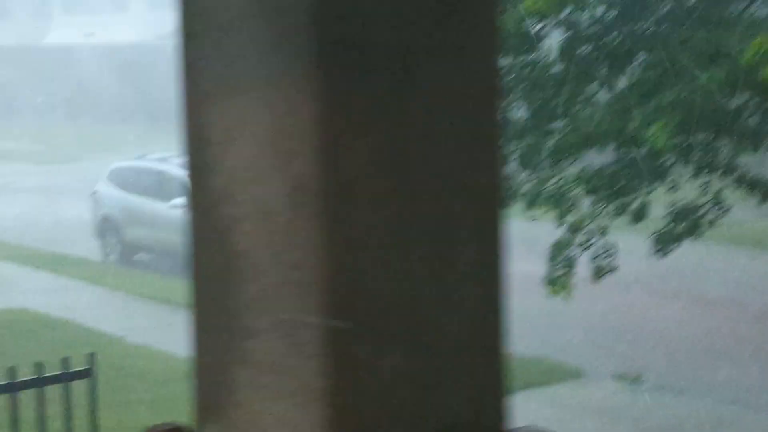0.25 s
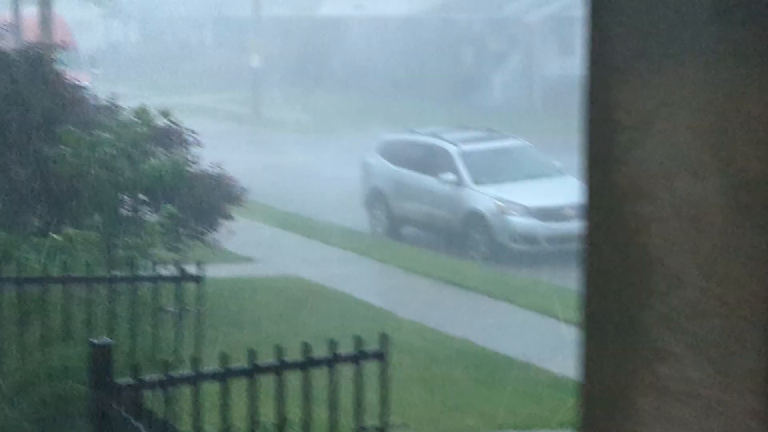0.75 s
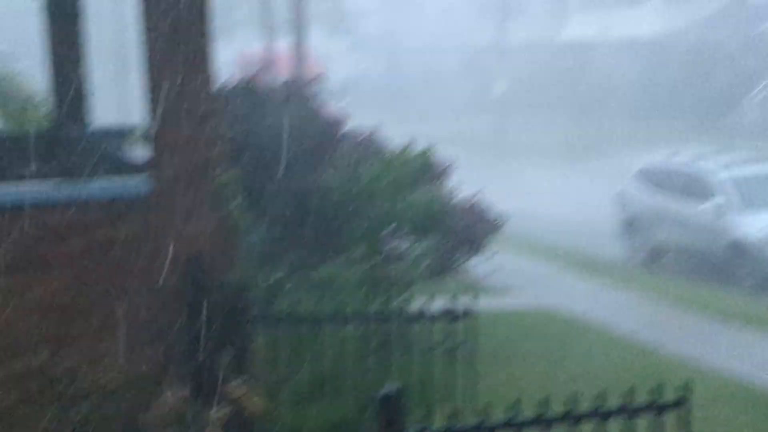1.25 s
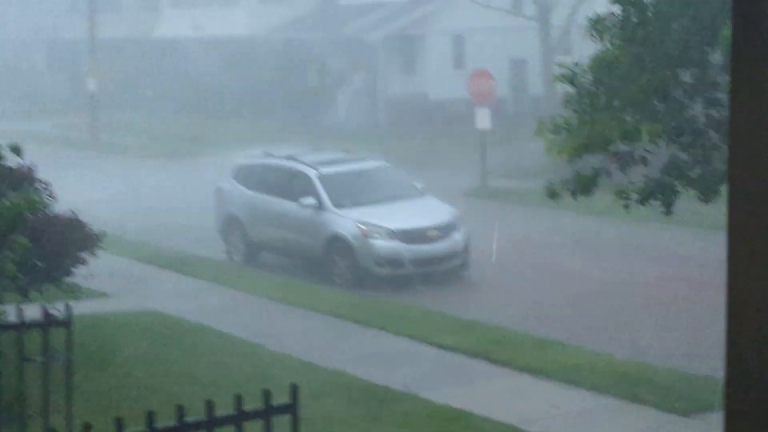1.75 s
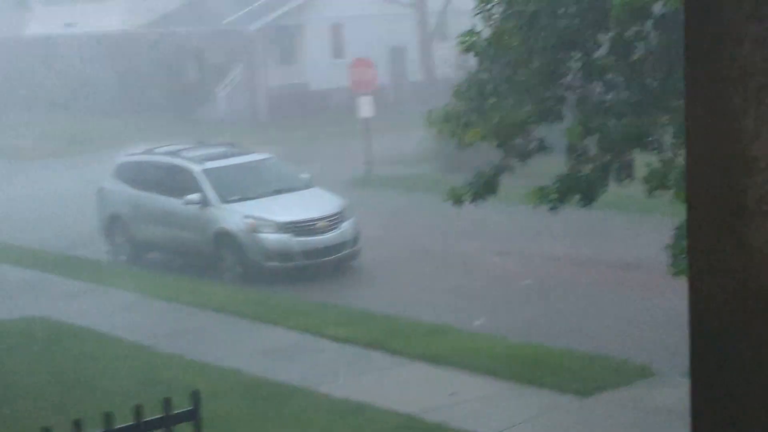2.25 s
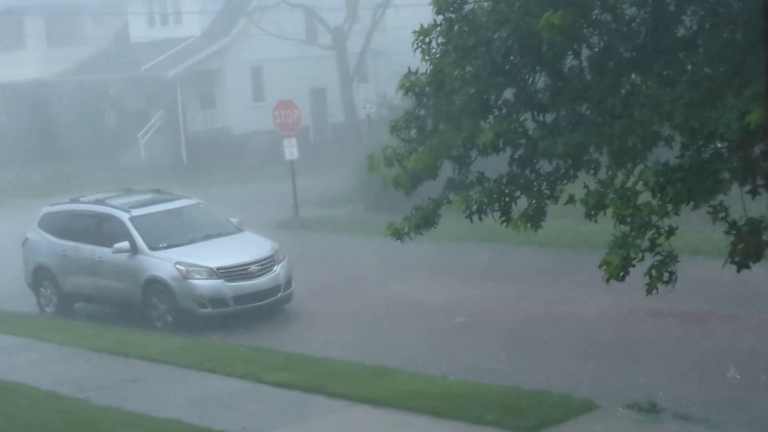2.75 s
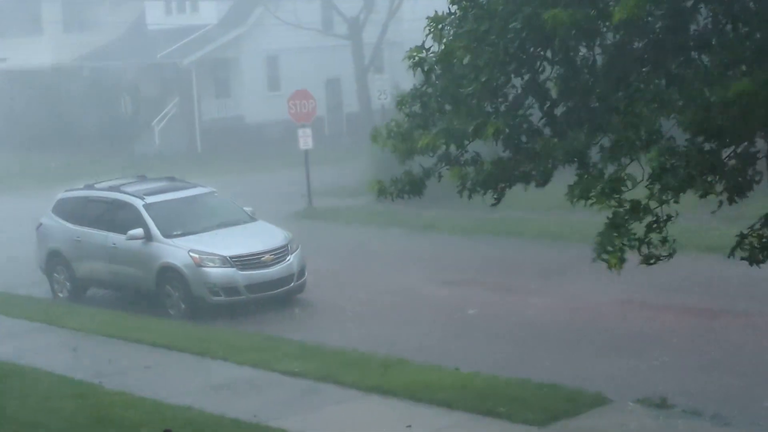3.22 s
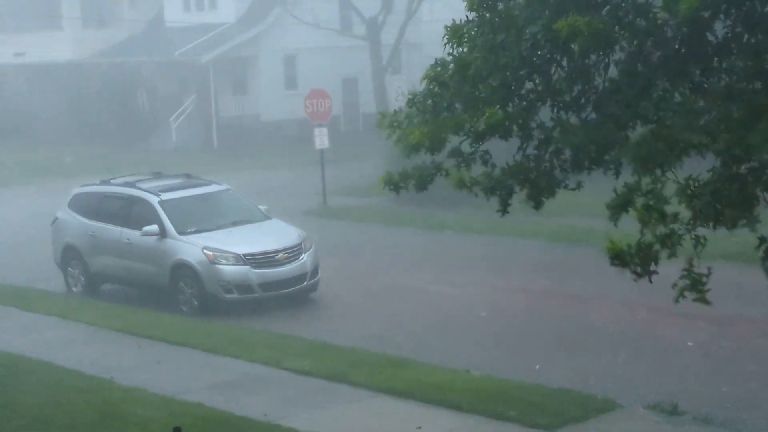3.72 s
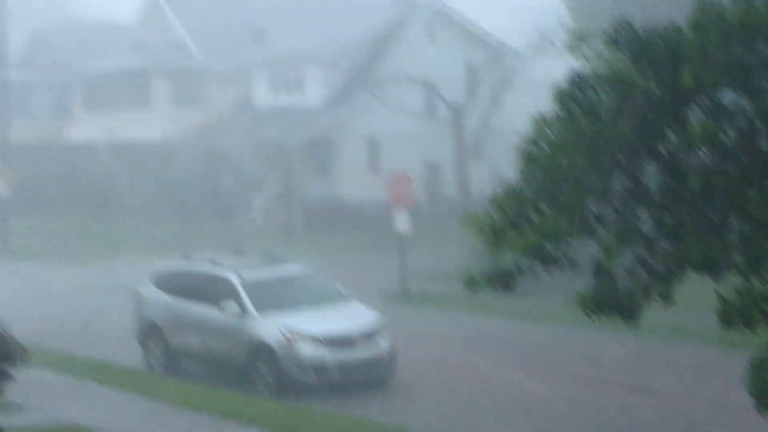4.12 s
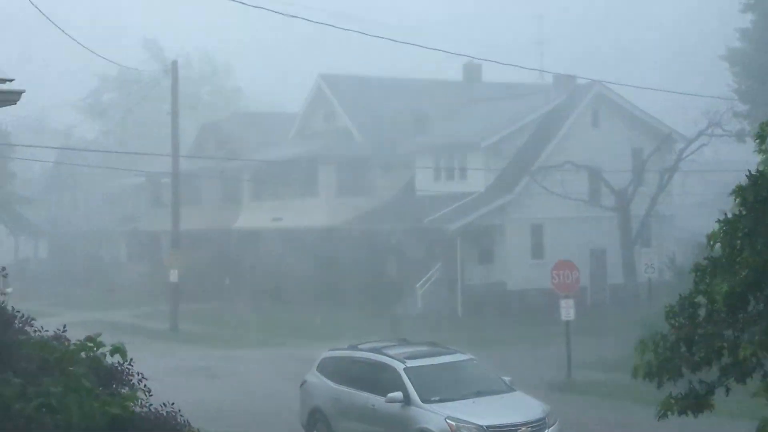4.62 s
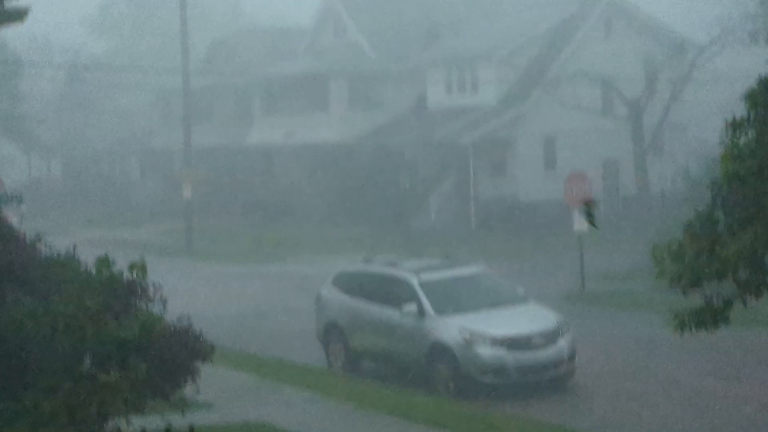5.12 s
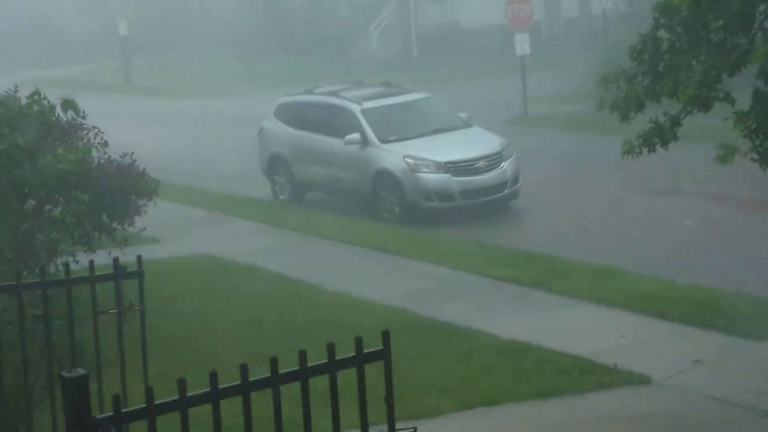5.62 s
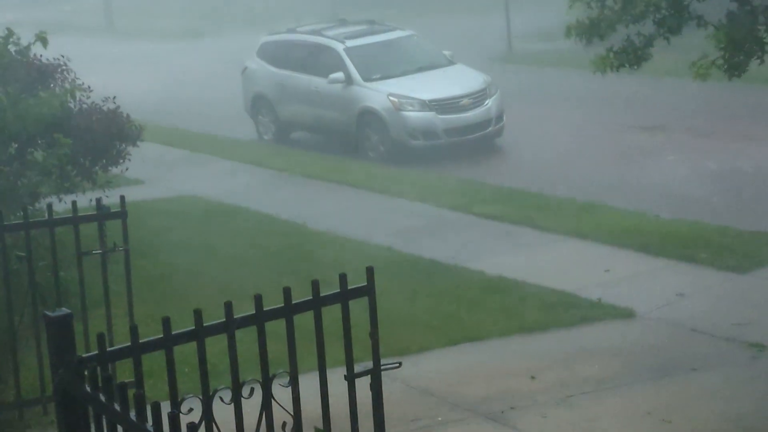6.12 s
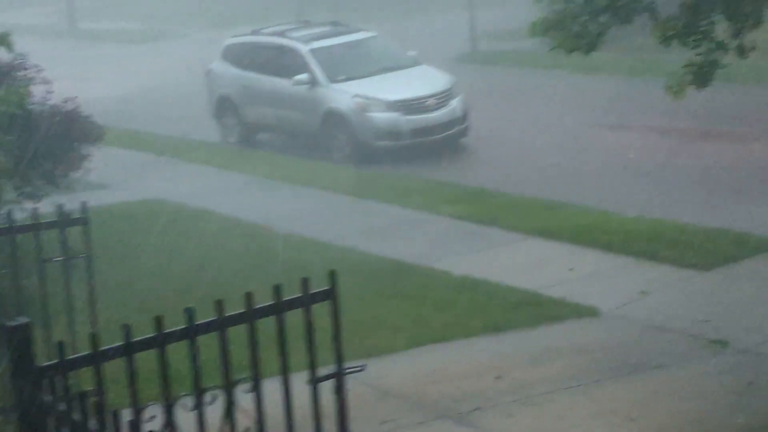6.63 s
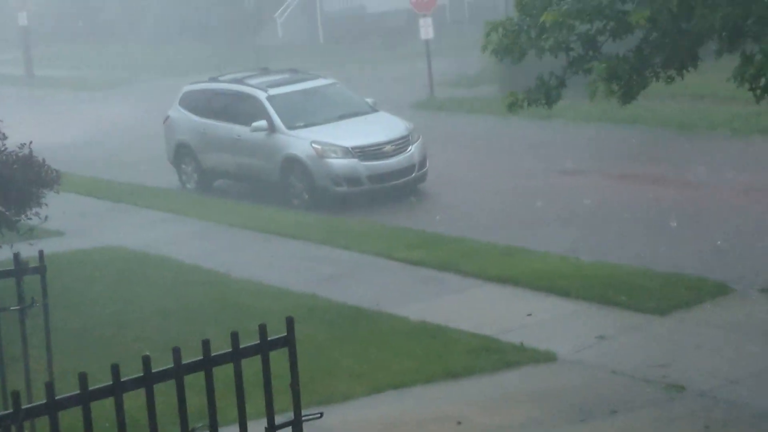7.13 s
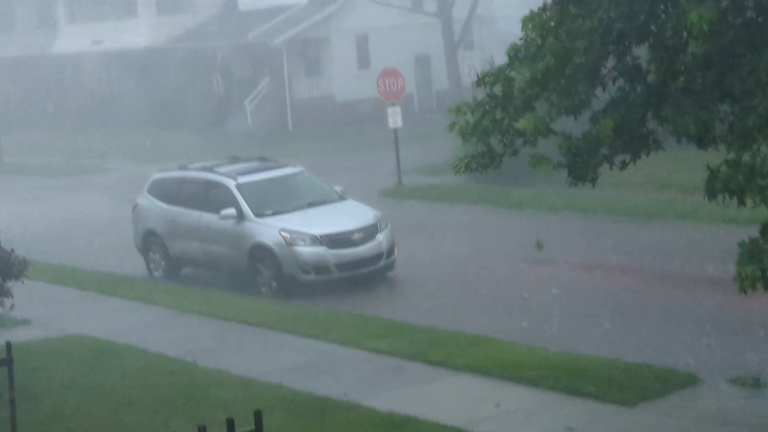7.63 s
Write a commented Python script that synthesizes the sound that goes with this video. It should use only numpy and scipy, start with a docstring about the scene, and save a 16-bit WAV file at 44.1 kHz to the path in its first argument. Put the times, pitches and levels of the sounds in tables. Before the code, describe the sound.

Heavy rain heard from a porch, with fat drips nearby and gusts thumping the microphone for the first three seconds.

```python
"""A cloudburst on a street, lawns and trees, heard from a porch on a hand-held stereo microphone pair.
From the start, countless drops merge into a bright, surging hiss and the storm roars low in the distance.
Gusts buffet the left microphone while fat drips splat close by, mostly on the right.
The gusts hit hardest near 2.5 s and are gone after 3 s; rain, drips and an easing roar carry on."""
import sys
import numpy as np
from scipy import signal
from scipy.fft import rfft, irfft, next_fast_len
from scipy.io import wavfile
from scipy.ndimage import uniform_filter1d

SR = 44100
rng = np.random.default_rng(int(sys.argv[2]) if len(sys.argv) > 2 else 0)


def int16_out(signal):
    """Quantize to a 16-bit WAV file."""
    q = np.round(np.clip(np.atleast_2d(signal).T, -1, 1) * 32767)
    wavfile.write(sys.argv[1], SR, q.astype(np.int16))


N = 346626
MIC_LAG = 21  # samples that sound needs from one microphone to the other
TOP_HZ = 15800


def undb(db):
    """Decibels to gain."""
    return 10 ** (np.asarray(db) / 20)


def unit(x):
    """Scale to rms 1."""
    return x / np.sqrt(np.mean(x ** 2))


def curve(table):
    """A (time, value) table joined by straight lines."""
    return np.interp(np.arange(N) / SR, *np.transpose(table))


def gains(points, hz):
    """Gain at each frequency of a (frequency [Hz], level [dB]) table."""
    f, db = np.transpose(points)
    return undb(np.interp(np.log(hz + 1), np.log(f), db))


def shape(x, response):
    """Filter x with a gain given as a function of frequency."""
    size = next_fast_len(x.shape[-1], True)
    hz = np.arange(size // 2 + 1) * SR / size
    return irfft(rfft(x, size) * response(hz), size)[..., :x.shape[-1]]


def hump(hz, centre_hz, octaves):
    """A flat-topped band on a log-frequency axis."""
    return 1 / (1 + (np.log2((hz + 1) / centre_hz) / octaves) ** 4)


def wander(per_s):
    """A smooth random drift of rms 1 that turns per_s times a second."""
    hold = SR // per_s
    steps = np.repeat(rng.standard_normal(N // hold + 1), hold)
    return unit(uniform_filter1d(steps, hold)[:N])


def swell(s, length_s):
    """A gain that rises to 1 at time s and dies away again."""
    return 1 / (1 + ((np.arange(N) / SR - s) / (.5 * length_s)) ** 4) ** 0.79


def add(out, sound, s):
    """Mix a sound in at time s."""
    start = int(np.clip(s * SR, 0, N - 1))
    out[:, start:start + sound.shape[1]] += sound[:, :N - start]


def drops(per_s, spread_db):
    """Drops click all around the porch; each reaches the two microphones with its own lag."""
    total = per_s * N // SR
    at = rng.integers(0, N, total)
    lag = rng.integers(-MIC_LAG, MIC_LAG + 1, total)
    nearness = np.minimum(rng.exponential(size=total), 6)
    size = rng.choice([-1, 1], total) * undb(spread_db * nearness)
    return unit(np.array([np.bincount(at, size, N), np.bincount((at + lag) % N, size, N)]))


# strength of the downpour beyond the porch: (time [s], relative level [dB])
RAIN_LEVEL = [(0, -22.4), (.7, -21.5), (1.45, -22), (1.85, -23), (2.3, -22), (3.1, -23), (3.92, -24),
              (4.12, -21.5), (4.65, -23.5), (5.02, -22.5), (5.22, -24.5), (5.55, -24), (5.95, -25),
              (6.6, -24.6), (7.0, -22.5), (7.86, -23)]
# colour of the rain from under the roof: (frequency [Hz], relative level [dB])
RAIN_SPECTRUM = [(200, -30.5), (600, -14), (1000, -9.5), (1600, -5.5), (2200, -2), (3200, -2.5),
                 (3950, -3.5), (5000, -1.2), (6400, 0.6), (7050, -1.46), (8100, 1.5), (9700, -4.5),
                 (11200, -3.5), (13500, -12.5), (16000, -13.5)]


def rain(trim_db=3.6, patter_follow=0.73):
    """Far drops fuse into a wash, nearer ones tick; heavy drops on leaves and paving fill the middle."""
    level_db = curve(RAIN_LEVEL)
    # the heavy drops follow only a share of each surge
    patter_db = -0.1 + (patter_follow - 1) * (level_db - level_db.mean()) + 0.19 * wander(per_s=7)
    wash = drops(per_s=30000, spread_db=1.17)
    ticks = drops(per_s=1100, spread_db=3.5)
    fall = shape(wash + undb(-10.5) * ticks, lambda hz: gains(RAIN_SPECTRUM, hz))
    fall = unit(fall) + undb(3.0) * plinks()
    fall *= undb(0.61 * wander(per_s=26))  # sheets of rain make the level flutter
    patter = shape(fall, lambda hz: 1 / (1 + (hz / 3700) ** 4))
    hiss = (fall - patter) * undb(0.85 * wander(per_s=50))
    patter *= undb(patter_db + 0.93 * wander(per_s=22))
    return (hiss + patter) * undb(level_db + trim_db)


def plinks(count=900):
    """Drops in puddles on either side trap small bubbles that ring briefly, rising a little in pitch."""
    out, t = np.zeros((2, N)), np.arange(SR // 25) / SR
    for when, pitch, size, side in rng.random((count, 4)):
        hz = 1900 * 4.5 ** pitch
        decay = np.exp(-t * np.sqrt(hz / 3000) / 0.0082)
        ring = np.sin(2 * np.pi * hz * t * (1 + 1.24 * t)) * decay
        pan = np.sqrt([[side], [1 - side]])
        add(out, undb(-12 * (2 - size ** 3)) * pan * ring, when * N / SR)
    return out


# the distant roar, easing as the squall passes: (time [s], relative level [dB])
ROAR_LEVEL = [(0, -41.5), (1.5, -42), (2.3, -38.5), (3.1, -44.5), (3.9, -45.5), (4.8, -44.5), (5.3, -44.5),
              (6.1, -48), (7.0, -44.5), (7.86, -48)]
# its brief swells: (time [s], relative level [dB])
ROAR_SWELLS = [(2.12, -38), (3.16, -41), (3.44, -44), (4.22, -46), (4.53, -40.5), (5.46, -44), (5.75, -38),
               (7.25, -44)]
# its colour from far off: (frequency [Hz], relative level [dB])
ROAR_SPECTRUM = [(25, -40), (40, -34), (58, -2.5), (100, 3.5), (160, -2.5), (240, -0.5), (305, -0.5),
                 (450, -5), (700, -9.5), (1500, -44), (4000, -60)]


def roar():
    """Distant rain and wind over the neighbourhood, so low that both microphones hear nearly the same."""
    far = shape(drops(per_s=8000, spread_db=4.0), lambda hz: gains(ROAR_SPECTRUM, hz))
    stir = shape(rng.standard_normal((2, N)), lambda hz: gains(ROAR_SPECTRUM, hz) / (1 + (hz / 200) ** 2))
    steady = undb(curve(ROAR_LEVEL) + 1.7 * wander(per_s=9))
    swells = sum(undb(db) * swell(s, length_s=0.099) for s, db in ROAR_SWELLS)
    return (undb(0.4) * unit(far) + undb(-8) * unit(stir)) * np.hypot(steady, swells)


# gusts right on the left microphone: (time [s], duration [s], relative level [dB])
GUSTS = [(0.047, 0.14, -36.5), (0.245, 0.033, -30.5), (0.377, 0.1, -32), (0.488, 0.012, -27),
         (0.562, 0.027, -31.5), (0.647, 0.071, -30.5), (0.805, 0.035, -39), (0.96, 0.012, -27),
         (1.222, 0.065, -31), (1.643, 0.11, -37.5), (1.902, 0.026, -29.5), (2.274, 0.026, -22),
         (2.314, 0.035, -19.5), (2.446, 0.02, -26), (2.553, 0.02, -13.5), (2.726, 0.033, -31.5),
         (2.907, 0.079, -33)]
# colour of wind on a microphone: (frequency [Hz], relative level [dB])
WIND_SPECTRUM = [(20, -32), (40, -45), (65, 0), (110, 2.5), (190, -1.5), (310, -2), (420, -7.5), (560, -11),
                 (800, -22), (1300, -21.5), (3000, -50), (8000, -75)]


def wind(breeze_db=-42, shelter_s=2.8, calm_db_per_s=30):
    """Eddies rumble on each microphone until the pair finds shelter; the left one faces the gusts."""
    t = np.arange(N) / SR
    shelter_db = calm_db_per_s * np.maximum(t - shelter_s, 0)
    breeze = undb(breeze_db - shelter_db + 1.5 * wander(per_s=16))
    gusts = sum(undb(db) * swell(s, length_s) for s, length_s, db in GUSTS)
    force = np.array([np.hypot(breeze, undb(5.5) * gusts), undb(-10.5) * breeze])
    eddies = shape(rng.standard_normal((2, N)), lambda hz: gains(WIND_SPECTRUM, hz))
    # evened out, so the force of the air sets how hard each eddy strikes
    eddies /= np.sqrt(uniform_filter1d(eddies ** 2, SR // 30))
    rumble = eddies * force
    # large, slow eddies trail behind each gust
    trail = unit(shape(rng.standard_normal(N), lambda hz: hump(hz, 82, 0.96)))
    rumble[0] += undb(-6.5) * trail * np.interp(t - .028, t, gusts)
    # the microphones pass little below 50 Hz
    return shape(rumble, lambda hz: 1 - 1 / (1 + (hz / 50) ** 4))


def splat(centre_hz, spray_db, lag, fall_s=0.0027, spray_s=0.03):
    """A close drip flattens in a few milliseconds, then its droplets rain down around it."""
    t = np.arange(SR // 8) / SR
    noise = rng.standard_normal((3, len(t)))
    burst = (t / fall_s) ** 1.5 * np.exp(-t / fall_s)
    burst /= burst.max()
    spray = undb(spray_db) * (1 - np.exp(-t / fall_s)) ** 2 * np.exp(-t / spray_s)
    direct = np.array([np.roll(noise[0] * burst, lag), noise[0] * burst])
    # porch floor and walls scatter the impact; the droplets make the tail grainy
    grain = unit(undb(1.9 * np.repeat(rng.standard_normal(len(t)), 24)[:len(t)]))
    scattered = noise[1:] * grain * np.hypot(0.75 * burst, 1.26 * spray)
    # hard ground gives a broad, bright smack; leaves and wood a narrower tap with a dull knock beneath
    octaves = 0.73 + centre_hz / 16000
    knock = undb(2) / (1 + (centre_hz / 3000) ** 3)

    def colour(hz):
        """The tone of the struck surface."""
        surface = hump(hz, centre_hz, octaves) + knock * hump(hz, 530, 0.96)
        return unit(surface * gains(RAIN_SPECTRUM, hz) ** 0.9 * (hz < TOP_HZ))

    return shape(np.pad(0.85 * direct + scattered, ((0, 0), (MIC_LAG, 0))), colour)


# fat drips close to the microphones: (time [s], relative level [dB], centre [Hz], relative spray [dB])
FAT_DRIPS = [(0.158, -22, 5400, -10), (0.212, -20, 7500, -17), (0.346, -27.5, 2600, 6),
             (0.423, -16, 9500, -11), (0.479, -25, 1130, -25), (0.659, -18.5, 3660, -10),
             (0.718, -21.5, 4800, -8), (0.96, -18, 11500, -0.5), (1.010, -25.5, 1700, -4),
             (1.251, -22, 4900, 2), (1.271, -18.5, 6500, -12), (1.468, -18.5, 4000, -5),
             (1.593, -19.5, 12500, -4), (1.948, -19.5, 5600, -16), (2.076, -18.5, 10000, 1.5),
             (2.087, -21.5, 2600, -1), (2.196, -17.5, 11000, -6), (2.674, -23, 9500, -29),
             (2.76, -24, 3300, -5), (3.026, -27.5, 2400, -1), (3.105, -28.5, 1500, -8),
             (3.228, -22.5, 4000, -12), (3.311, -23, 5600, -15), (3.607, -22, 6500, -4),
             (3.781, -24, 3200, -3), (4.021, -22, 4400, -9), (4.05, -22, 4100, -8),
             (4.231, -19.5, 7100, -14), (4.308, -30.5, 1150, -1), (4.438, -22, 2200, -3),
             (4.662, -23, 6400, -4), (4.899, -19.5, 6900, -17), (5.509, -18.7, 3200, -12),
             (5.653, -22.5, 2900, -4), (5.9, -21, 8000, -4), (6.638, -23, 7800, -8),
             (6.718, -21.5, 6100, -5), (7.234, -19.5, 2700, -5), (7.602, -20, 5700, -5),
             (7.839, -19.5, 7700, -7)]


def drips(count=210):
    """Run-off from eaves and branches lands by the porch: a few fat splats among many small ones."""
    out, rain_db = np.zeros((2, N)), curve(RAIN_LEVEL)
    for s, db, centre_hz, spray_db in FAT_DRIPS:
        drip = splat(centre_hz, spray_db, lag=rng.integers(0, MIC_LAG))
        add(out, undb(db + 3) * drip, s - .0015)  # it starts to swell just before its time
    # the small ones fall at a fairly even rate, each a little early or late
    for k, (late, size, pitch, side) in enumerate(rng.random((count, 4))):
        when = (k + late) / count
        db = rain_db[int(when * N)] - 12.0 + 7 * size + 8 * pitch  # bright smacks carry furthest
        drip = splat(1200 * 9.5 ** pitch, spray_db=-5.5, lag=int((2 * side - 1) * MIC_LAG))
        add(out, undb(db) * drip, when * N / SR)
    return out


# how the pair hears the water: (frequency [Hz], left minus right [dB])
MIC_BALANCE = [(300, -2), (700, 0), (1300, -3), (2300, -5), (3600, -2.5), (4500, -4.5), (6300, -6),
               (8200, -5.5), (9700, -3.5), (11500, 4.5), (12400, 1.5), (13700, 0.5), (15500, 1)]
# the lean as the pair swings in the hand: (time [s], extra left minus right [dB])
MIC_SWING = [(0, -0.8), (1.6, 0), (3.4, -0.7), (4.1, -1.4), (6, -0.4), (7.86, -0.5)]


def lean(water):
    """Rain and drips reach the microphones mostly from the porch's open right side."""
    def balance(hz):
        """Left and right gains at constant total power."""
        left = gains(MIC_BALANCE, hz)
        return np.array([left, np.ones(len(hz))]) * np.sqrt(2 / (1 + left ** 2))

    swing_db = curve(MIC_SWING)
    return shape(water * undb(np.array([swing_db, -swing_db]) / 2), balance)


def scene():
    """From the porch: rain and close drips over the far roar and the wind on the microphones."""
    return lean(rain() + drips()) + roar() + wind()


def record(dry):
    """The recorder limits at full scale and cuts the top."""
    lowpass = signal.ellip(12, .1, 80, TOP_HZ, fs=SR, output="sos")
    return signal.sosfilt(lowpass, np.clip(dry, -1, 1))


dry = scene()
out = record(dry)
int16_out(out)
```